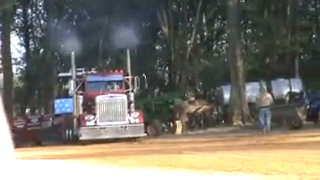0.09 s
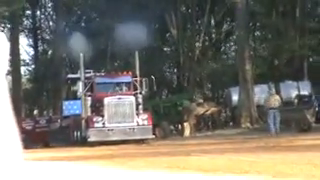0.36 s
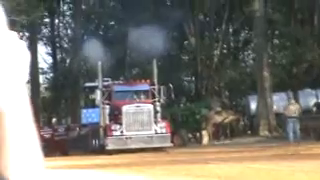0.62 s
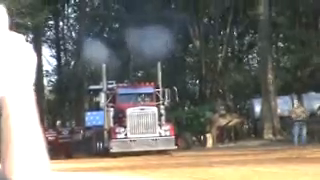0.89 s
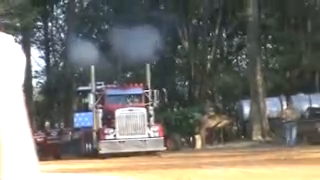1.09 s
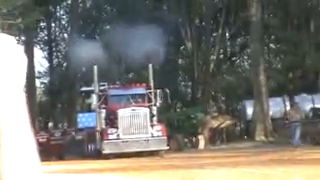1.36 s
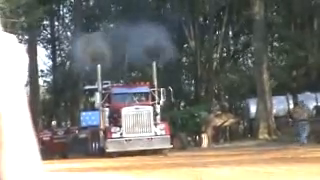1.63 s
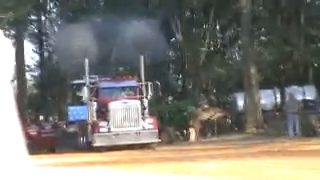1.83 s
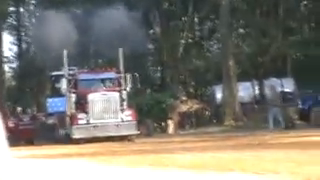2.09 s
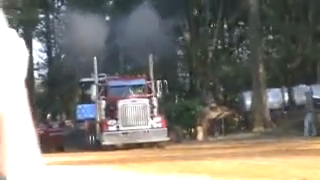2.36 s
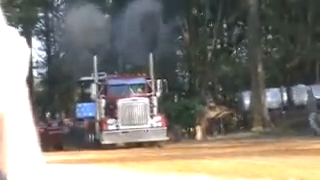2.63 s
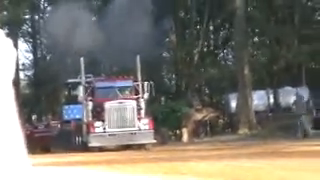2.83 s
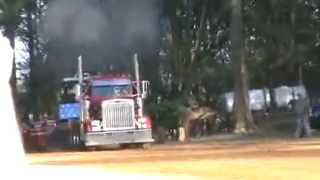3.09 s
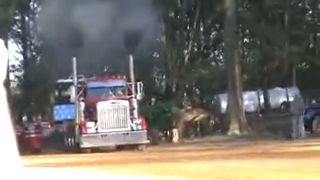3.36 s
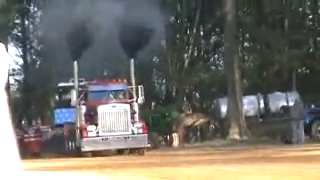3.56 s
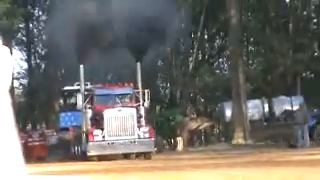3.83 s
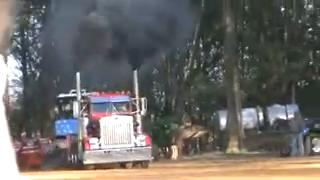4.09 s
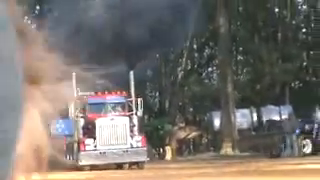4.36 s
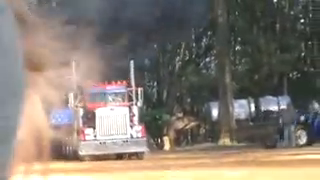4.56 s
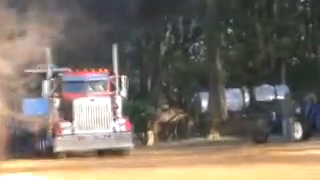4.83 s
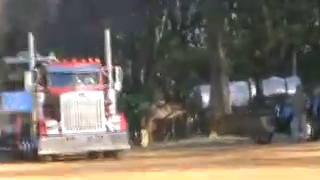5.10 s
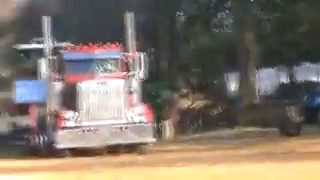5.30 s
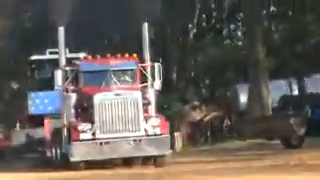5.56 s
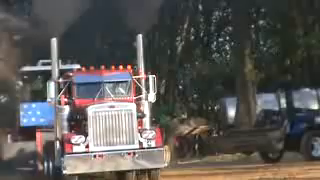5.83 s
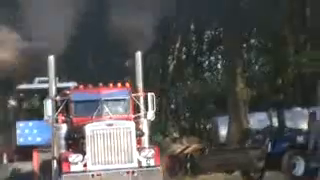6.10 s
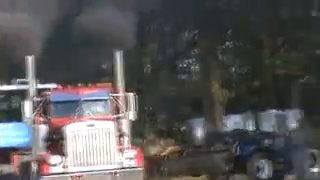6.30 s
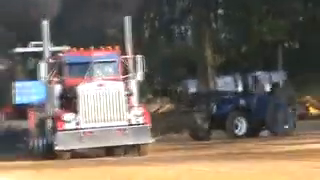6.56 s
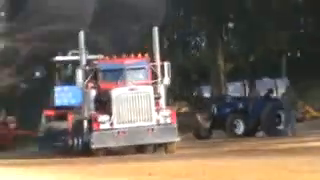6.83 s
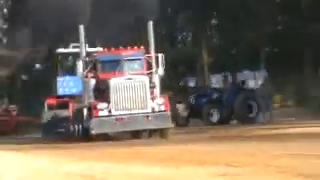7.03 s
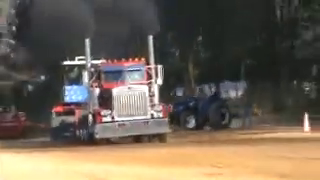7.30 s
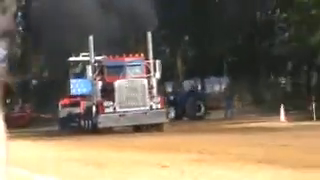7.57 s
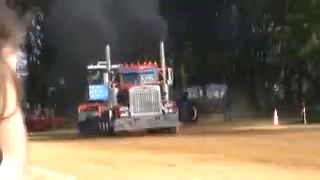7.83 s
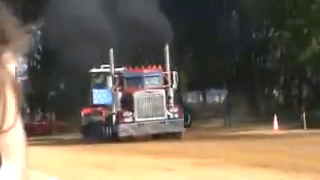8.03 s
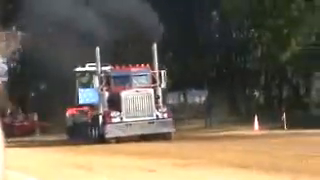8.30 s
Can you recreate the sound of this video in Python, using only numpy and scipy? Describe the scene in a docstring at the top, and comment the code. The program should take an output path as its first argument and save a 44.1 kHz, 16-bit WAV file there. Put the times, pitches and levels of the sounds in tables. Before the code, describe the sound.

Outdoors beside a dirt pulling track, a heavy diesel truck strains at full throttle. A steady low drone and gritty exhaust roar dominate, with wind thumping the microphone. A thin turbo whistle climbs and vanishes as the drone flutters with small cracks. The pitch sags under load, then recovers, ending in rapid crackling.

```python
"""A six-cylinder diesel truck hauls a heavy sled on a dirt track among trees, heard from the trackside.
From the start, sines on the crank orders drone, noise gated by each firing roars, low noise rumbles and
gusts bump two microphone ports; a crack, a decaying noise burst, comes early. The turbo, narrow noise, climbs
for over two seconds and fades as the drone stumbles and two more cracks come. The firing rate sags until about
seven seconds and recovers; a lone crack, then a crackle on every crank turn with two loud cracks, close it."""
import sys
import numpy as np
from scipy import signal
from scipy.fft import rfft, irfft, next_fast_len
from scipy.io import wavfile
from scipy.ndimage import uniform_filter1d

SR = 44100
rng = np.random.default_rng(int(sys.argv[2]) if len(sys.argv) > 2 else 0)


def voltage_ratio(decibels):
    """Convert decibels (scalar or array-like) to amplitude ratios, 20 dB per decade."""
    exponent = np.asarray(decibels, float) / 20
    return 10 ** exponent


def persist_wave(psi):
    """Save psi, clipped to +-1, as 16-bit WAV."""
    counts = np.round(np.clip(psi, -1, 1) * 32767).astype(np.int16)
    wavfile.write(sys.argv[1], SR, np.atleast_2d(counts).T)


N = 371322   # samples

# Engine speed and main tones. Each row: time in seconds, firings per second, firing tone in dB, its octave in dB.
ENGINE_CURVE = [(0, 140, -17, -36.5), (.25, 154, -13.5, -29.5), (.5, 155.5, -10, -28.5),
                (1.2, 157.2, -10, -27.5), (1.4, 155, -12.5, -36), (1.7, 152.8, -10.5, -31.5),
                (2.0, 152, -11.5, -37), (2.8, 156, -10.5, -31.5), (3.2, 153, -11.5, -31),
                (3.7, 153.3, -11.5, -27.5), (4.4, 139, -11.5, -25), (4.95, 139.4, -11.5, -24.5),
                (5.2, 136.3, -13, -19), (5.9, 131.4, -12.5, -18.5), (6.1, 125.5, -12, -18),
                (6.35, 128, -13, -18), (6.9, 122.4, -12.5, -17), (7.5, 130.7, -14, -17),
                (7.75, 137.4, -15, -18.5), (8.1, 139.6, -14.5, -19.5), (8.42, 140, -14, -20)]
# Weaker crank orders, three firings a turn. Each row: order in cycles per crank turn, level in dB over the roar.
CRANK_ORDERS = [(1, -15.5), (2, -11), (7, -9), (8, -10), (9, -10), (10, -16.5), (12, -14), (13, -12)]
# Uneven firing while the truck strains. Each row: time in seconds, fourth and fifth crank order in dB.
UNEVEN_FIRING = [(0, -26.5, -24.5), (.3, -25.5, -30.5), (.6, -40, -32.5), (1.3, -38, -36), (1.6, -31, -30),
                 (2.401, -25, -26.5), (3.9, -27.5, -28), (4.9, -38.5, -29.5), (6.5, -44.5, -33),
                 (7.4, -48, -29), (8.42, -36, -24.5)]
# Dips of the drone while the truck strains. Each row: time of the deepest point in seconds, depth in dB.
STUMBLE_DIPS = [(1.679, 4), (1.842, 9), (1.998, 8.5), (2.2, 6.5), (2.28, 5.5), (2.356, 2.5), (2.437, 10),
                (2.519, 7), (2.633, 6.5), (2.719, 17.5), (2.801, 8.5), (2.878, 6.5), (2.935, 6),
                (3.035, 4.5), (3.112, 2.5), (3.225, 5.5), (3.314, 3.5), (3.413, 4.5), (3.635, 3.5)]
OCTAVE_LAG_RAD, STUMBLE_MS = 3.0, 18   # the dip is this wide at half its depth in dB

# Exhaust roar. Each row: time in seconds, roar in dB, treble setting in dB against the roar.
ROAR_CURVE = [(0.0, -37, -9), (0.07, -31.5, -13), (0.86, -37.5, -7), (1.31, -37, -13), (1.94, -32, -11.5),
              (3.0, -30.5, -11.5), (3.4, -31.5, -11.5), (4.21, -30, -7.5), (5.19, -30.5, -9),
              (5.76, -27, -11.5), (6.13, -32, -9.5), (6.83, -30, -12), (7.09, -33, -9), (7.51, -30, -12),
              (8.05, -29, -6.5), (8.42, -28, -4)]
# Spectrum of the roar. Each row: frequency in Hz, relative density in dB per Hz.
ROAR_SPECTRUM = [(30, -14.5), (60, -17.5), (110, 7.5), (200, 11.5), (330, 10), (450, 0), (600, -1),
                 (665, 2), (740, 0.5), (1300, -6.5), (2300, -13), (4300, -22), (6400, -28), (8000, -42.5),
                 (12000, -58)]
# Puff strength of the three firings in one crank turn, each in relative dB.
FIRING_STRENGTH_DB = [-2, 0, -5]
PUFF_DEPTH, PUFF_PER_DB = .45, .03   # depth 0-1 at a treble setting of 0 dB; its change per dB

# Turbo tone. Each row: time in seconds, centre in Hz, level in dB.
TURBO_CURVE = [(0, 4250, -55.5), (.5, 4786, -55.5), (1, 5120, -59), (1.5, 5460, -56), (1.8, 6420, -54.5),
               (2, 7180, -48.5), (2.2, 7650, -48.5), (2.4, 8200, -54), (2.6, 8030, -58.5), (2.8, 8350, -79),
               (8.42, 8200, -82.5)]
# Faint narrow noise band near 9 kHz, loudest around 3.6 s. Each row: time in seconds, level in dB.
FAINT_BAND = [(0.0, -78), (0.3, -71.5), (1.38, -85.5), (2.49, -66.5), (3.59, -61.5), (4.27, -77.5),
              (7.24, -78.5), (8.21, -67), (8.42, -66)]
TURBO_WIDTH_HZ = 230   # to either side of the centre

# Low rumble of truck and sled. Each row: time in seconds, level in dB.
RUMBLE_CURVE = [(0.0, -27.5), (0.09, -17.5), (0.6, -28), (1.25, -30), (2.7, -24.5), (3.5, -32),
                (6.5, -42.5), (7.4, -38.5), (8.42, -35)]

# Gusts on the microphone. Each row: time of the peak in seconds, peak in dB.
GUST_PEAKS = [(0.02, -14.5), (.3, -22), (.88, -29.5), (1.37, -25), (1.7, -27), (2.01, -20), (2.29, -23),
              (2.55, -27.5), (2.87, -19.5), (3.5, -21.5), (3.86, -23.5), (4.17, -32), (4.829, -26),
              (5.3, -26), (6.08, -28), (7.18, -22), (7.71, -27)]
GUST_RISE_DB_PER_S, GUST_FALL_DB_PER_S, BREEZE_DB = 92.5, 68.5, -38.5

# Individually timed cracks from the stacks: four lone ones, then two loud ones within the closing crackle.
# Each row: start in seconds, peak in dB before filtering.
TIMED_CRACKS = [(0.0523, -23), (2.641, -26.5), (2.728, -27), (7.889, -34), (8.1492, -15), (8.2556, -14.5)]
# Near the end one cylinder cracks on every crank turn; levels before filtering.
CRACKLE_FROM_S, CRACKLE_DB, CRACKLE_SPREAD_DB = 8.1066, -17, 0.5

GROUND_LAG_S, GROUND_SHARE = .001044, .4
# Phase between the ports. Each row: frequency in Hz, lead of the left port in radians.
PORT_LEAD = [(30, 0.78), (140, 0.68), (300, 0.31), (410, 0.91), (520, 0.27), (650, 0.22), (820, 0.12),
             (1000, 1.1), (1200, 0.13), (1500, 0.068)]
# Threshold for muting quiet bands. Each row: frequency in Hz, level in dB under which a band is muted.
MUTE_THRESHOLD = [(2500, -88), (3500, -77), (4500, -75), (6000, -76), (8400, -75), (8800, -110)]
HISS_DB, HISS_CUT_HZ = -69.5, 8000   # preamp hiss before its low-pass


def rms_one(x):
    """Normalization: a signal divided by its root mean square has rms 1."""
    return x / np.sqrt(np.mean(x ** 2) + 1e-20)


def in_time(rows):
    """Linear interpolation: the columns of a curve table at every sample."""
    s, *columns = np.transpose(rows)
    return [np.interp(np.arange(N) / SR, s, c) for c in columns]


def at_hz(points, hz):
    """Logarithmic pitch: a spectrum table is interpolated along log frequency."""
    table_hz, values = np.transpose(points)
    return np.interp(np.log(hz + 1), np.log(table_hz), values)


def drift(rate):
    """Random fluctuation: noise through two equal poles at rate (Hz) wanders slowly, with rms 1."""
    # computed at every 20th sample; the first 4000 values let the filter settle
    pole = np.exp(-40 * np.pi * rate / SR)
    noise = rng.standard_normal(N // 20 + 4002)
    slow = signal.lfilter([1], [1, -2 * pole, pole * pole], noise)[4000:]
    return np.interp(np.arange(N) / 20, np.arange(len(slow)), rms_one(slow))


def cut(x, hz, kind, order=2):
    """Filtering: a Butterworth response is flat in its passband."""
    return signal.sosfilt(signal.butter(order, hz, kind, fs=SR, output="sos"), x)


def coloured(x, response):
    """Linear filtering: the spectrum is multiplied by response(hz)."""
    size = next_fast_len(N)
    spectrum = rfft(x, size) * response(np.fft.rfftfreq(size, 1 / SR))
    return irfft(spectrum, size)[..., :N]


def stumbling():
    """Amplitude modulation: a gain with a bell-shaped dip in dB at each stumble."""
    t, dip_db = np.arange(N) / SR, np.zeros(N)
    for s, depth_db in STUMBLE_DIPS:
        near = slice(int((s - .1) * SR), int((s + .1) * SR))
        widths_away = (t[near] - s) * 1000 / STUMBLE_MS
        dip_db[near] -= depth_db * np.exp(-4 * np.log(2) * widths_away ** 2)
    return voltage_ratio(dip_db)


def drone(crank, firing_db, octave_db, waver_db, weak_waver_db, slip_rad):
    """Harmonic synthesis: crank orders are sines; uneven burning makes them waver, the weak ones most."""
    uneven = voltage_ratio(waver_db * drift(31)) * stumbling()
    wobble = crank + 0.018 * drift(30)
    out = voltage_ratio(firing_db) * np.sin(3 * wobble)
    out += voltage_ratio(octave_db + 1.5 * drift(12)) * np.sin(6 * wobble - OCTAVE_LAG_RAD)
    roar_db = in_time(ROAR_CURVE)[0]
    weak_orders = [*zip((4, 5), in_time(UNEVEN_FIRING))]
    weak_orders += [(order, roar_db + db) for order, db in CRANK_ORDERS]
    for order, level_db in weak_orders:
        level = voltage_ratio(level_db + weak_waver_db * drift(12.0))
        out += level * np.sin(order * crank + slip_rad * np.sqrt(order) * drift(4.7))
    return np.sqrt(2) * uneven * out   # the root of two gives each sine its level as rms


def roar(crank, patchy_db, puff_sharpness):
    """Modulated flow noise: each firing gates the exhaust noise, most deeply where the treble is strong."""
    roar_db, treble_db = in_time(ROAR_CURVE)
    noise = coloured(rng.standard_normal((2, N)), lambda hz: voltage_ratio(at_hz(ROAR_SPECTRUM, hz)))
    noise /= np.std(cut(noise[0], [450, 1500], "band"))
    firing = 3 * crank / (2 * np.pi)   # firings so far
    strength = voltage_ratio(FIRING_STRENGTH_DB)[firing.astype(int) % 3]
    decay = np.exp(-puff_sharpness * (firing % 1))
    puff = rms_one(cut(strength * decay, 1000, "low"))
    depth = np.clip(PUFF_DEPTH + PUFF_PER_DB * treble_db, 0, 1)
    low = cut(noise, 400, "low") * voltage_ratio(patchy_db * drift(10))
    dull = cut(noise, 1500, "low", order=1)
    middle = cut(dull, 330, "high") * voltage_ratio(patchy_db * drift(26)) * (1 + 0.2 * depth * (puff - 1))
    high = (noise - dull) * voltage_ratio(treble_db + 8.5 + 1.1 * drift(9.1)) * (1 + depth * (puff - 1))
    return voltage_ratio(roar_db) * (low + middle + high)


def turbo(skirt_hz, skirt_db):
    """Quadrature modulation: slow noise rides the compressor's pitch, with a skirt and a faint band near 9 kHz."""
    centre_hz, level_db = in_time(TURBO_CURVE)
    out = 0
    for below_hz, width_hz, db in [(0, TURBO_WIDTH_HZ, 0), (skirt_hz, skirt_hz, skirt_db)]:
        a, b = cut(rng.standard_normal((2, N)), width_hz, "low", order=3)
        phase = 2 * np.pi * np.cumsum(centre_hz - below_hz) / SR
        out = out + voltage_ratio(level_db + db) * rms_one(a * np.cos(phase) + b * np.sin(phase))
    faint = rms_one(cut(rng.standard_normal(N), [8850, 9500], "band", order=6))
    return out + voltage_ratio(in_time(FAINT_BAND)[0]) * faint


def rumble(low_hz, high_hz, lumps_db):
    """Band-limited noise: a low band with a randomly fluctuating level."""
    band = rms_one(cut(rng.standard_normal(N), [low_hz, high_hz], "band"))
    return voltage_ratio(in_time(RUMBLE_CURVE)[0] + lumps_db * drift(22)) * band


def gusts_db():
    """Exponential growth and decay: each gust rises and falls steadily in dB over a light breeze."""
    t, level_db = np.arange(N) / SR, np.full(N, float(BREEZE_DB))
    for s, db in GUST_PEAKS:
        below_peak_db = np.maximum(GUST_RISE_DB_PER_S * (s - t), GUST_FALL_DB_PER_S * (t - s))
        level_db = np.maximum(level_db, db - below_peak_db)
    return level_db


def wind(lumps_db, low_hz, high_hz, alike):
    """Turbulent pressure: lumpy gusts push the two ports mostly in opposite directions."""
    soft = cut(rng.standard_normal((2, N)), high_hz, "low", order=1)
    mid, side = cut(cut(soft, low_hz, "high"), 500, "low")
    gust = voltage_ratio(gusts_db() + lumps_db * drift(20))
    return gust * (alike * rms_one(mid) + rms_one(side) * [[1], [-1]])


def cracks(crank, decay_s, dull_hz, low_hz, high_hz):
    """Impulsive excitation: each crack is a short, bright, exponentially decaying burst of noise."""
    clicks = np.full(N, 1e-18)
    start = round(CRACKLE_FROM_S * SR)
    turn_count = (crank[start - 1:] - crank[start]) // (2 * np.pi)
    turns = start + np.flatnonzero(np.diff(turn_count))
    clicks[turns] = voltage_ratio(CRACKLE_DB + CRACKLE_SPREAD_DB * rng.standard_normal(len(turns)))
    for s, db in TIMED_CRACKS:
        clicks[round(s * SR)] = voltage_ratio(db)
    fading = signal.lfilter([1], [1, -np.exp(-1 / (decay_s * SR))], clicks)
    dull = cut(fading * rng.standard_normal(N), dull_hz, "low", order=1)
    return cut(cut(dull, low_hz, "high"), high_hz, "low", order=6)


def ground(x):
    """Comb interference: a short inverted bounce, strongest in the lower treble, adds to the direct sound."""
    lag = round(GROUND_LAG_S * SR)
    bounce = np.pad(x, [(0, 0), (lag, 0)])[:, :N]
    band = signal.butter(1, [1500, 9000], "band", fs=SR, output="sos")
    return x - GROUND_SHARE * signal.sosfiltfilt(band, bounce)


def two_ports(x):
    """Phase difference: the left port leads the right by an angle that depends on pitch."""
    return coloured(x, lambda hz: np.exp(.5j * at_hz(PORT_LEAD, hz) * [[1], [-1]]))


def scene():
    """Superposition: truck ahead, scattered roar from the trees, wind on the ports."""
    firings_per_s, *tones_db = in_time(ENGINE_CURVE)
    crank = 2 * np.pi * np.cumsum(firings_per_s / 3) / SR   # crank angle in radians
    tone = drone(crank, *tones_db, waver_db=0.87, weak_waver_db=3.0, slip_rad=0.29)
    exhaust = roar(crank, patchy_db=1.27, puff_sharpness=1.6)
    bright = turbo(skirt_hz=457, skirt_db=-2)
    bright += cracks(crank, decay_s=.0028, dull_hz=2600, low_hz=1600, high_hz=6780)
    direct, scattered = ground(exhaust + bright)
    low = rumble(low_hz=49, high_hz=129, lumps_db=-0.5)
    trees = voltage_ratio(-11.0) * cut(scattered, 1300, "low", order=4) * [[1], [-1]]   # opposite in the two ports
    gusts = wind(lumps_db=1.0, low_hz=35, high_hz=101, alike=.5)
    return two_ports(tone + direct) + low + trees + gusts


def mute_quiet_bands(x, size=2048, count=2):
    """Spectral gating: in every frame, narrow bands under a threshold are turned down by 25 dB."""
    hz, _, cells = signal.stft(x, SR, nperseg=size)
    power = uniform_filter1d(np.abs(cells.mean(axis=0)) ** 2, count, axis=0)
    threshold = voltage_ratio(2 * at_hz(MUTE_THRESHOLD, hz))[:, None]   # doubled dB, for power
    gain = np.where(power > threshold, 1, voltage_ratio(-25))
    return signal.istft(cells * gain, SR, nperseg=size)[1][:, :N]


def low_pass(x):
    """Removes everything above the highest recorded frequency."""
    return signal.sosfilt(signal.butter(12, 15700, fs=SR, output="sos"), x)


def record(dry):
    """Saturation: peaks are gently rounded, quiet narrow bands drop out from moment to moment, and the preamp
    hisses faintly."""
    rounded = 1.103 * np.tanh(dry / 1.088)
    hiss = voltage_ratio(HISS_DB) * cut(rng.standard_normal(N), HISS_CUT_HZ, "low", order=1)
    return low_pass(mute_quiet_bands(rounded) + hiss)


dry = scene()
out = record(dry)
persist_wave(out)
```